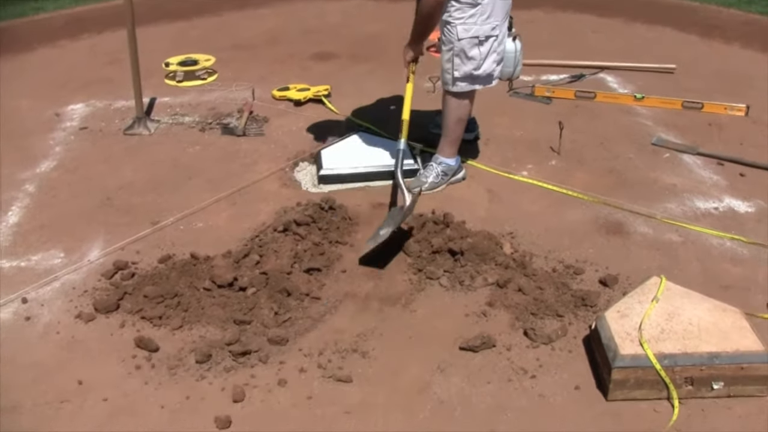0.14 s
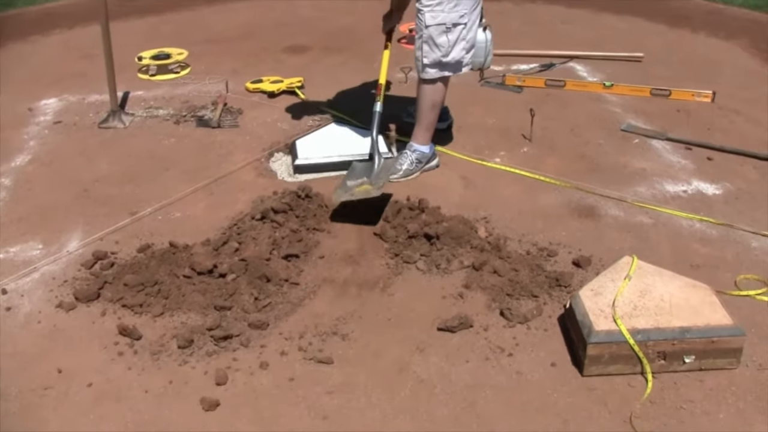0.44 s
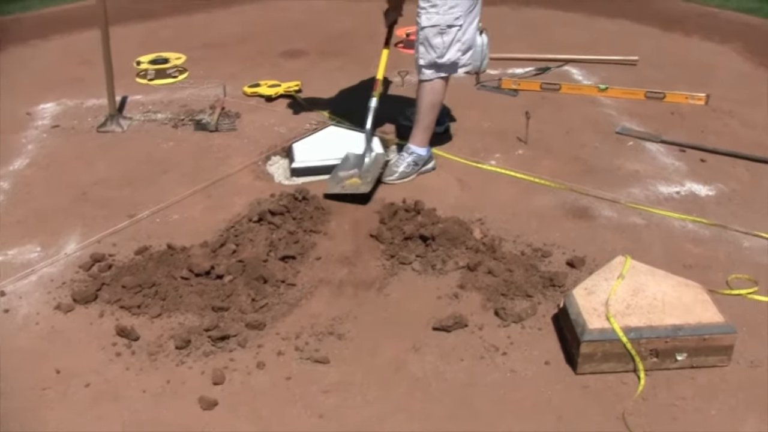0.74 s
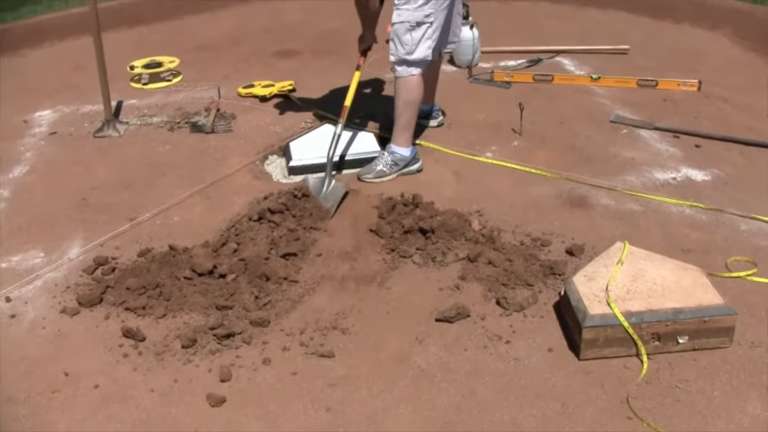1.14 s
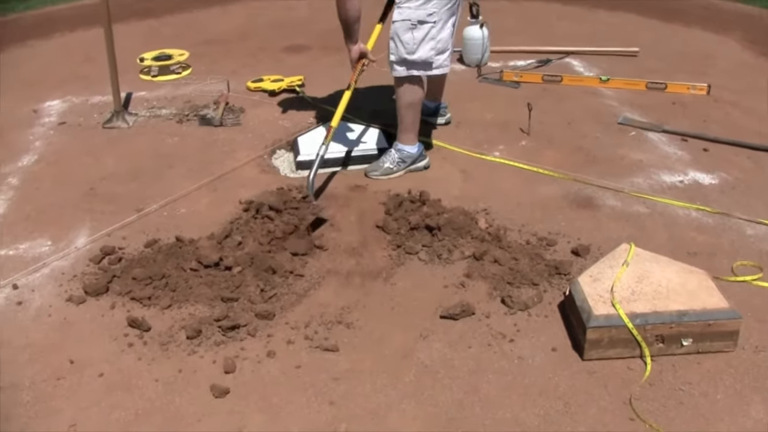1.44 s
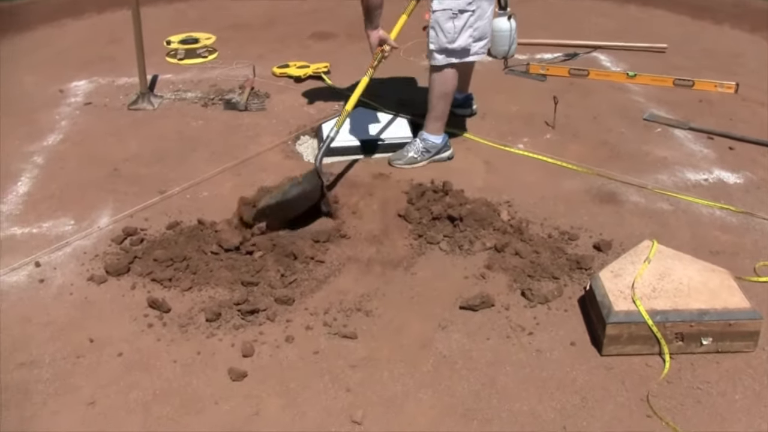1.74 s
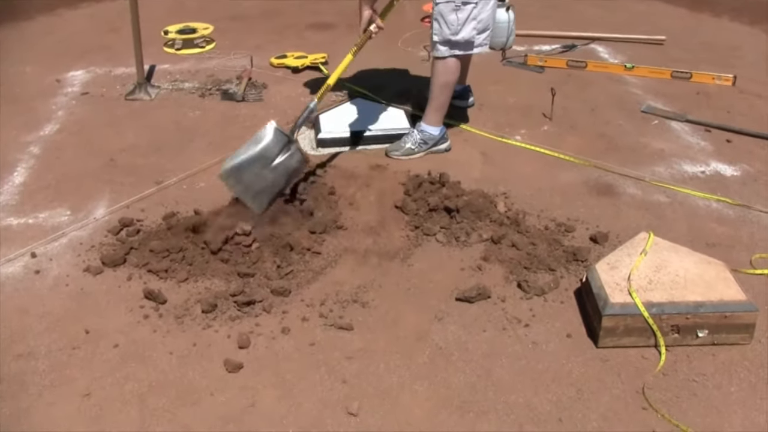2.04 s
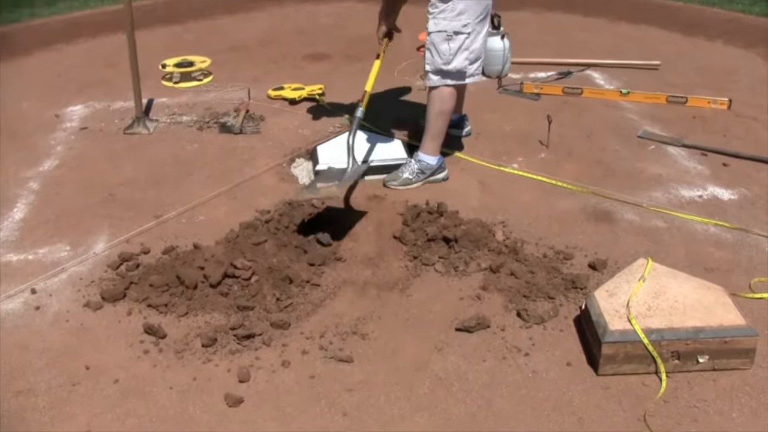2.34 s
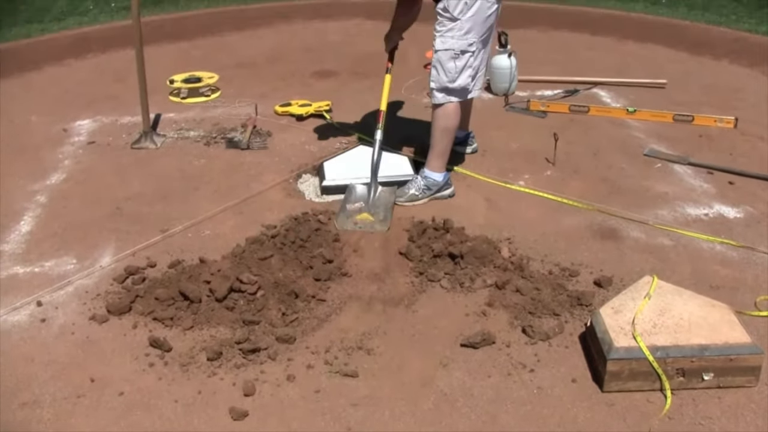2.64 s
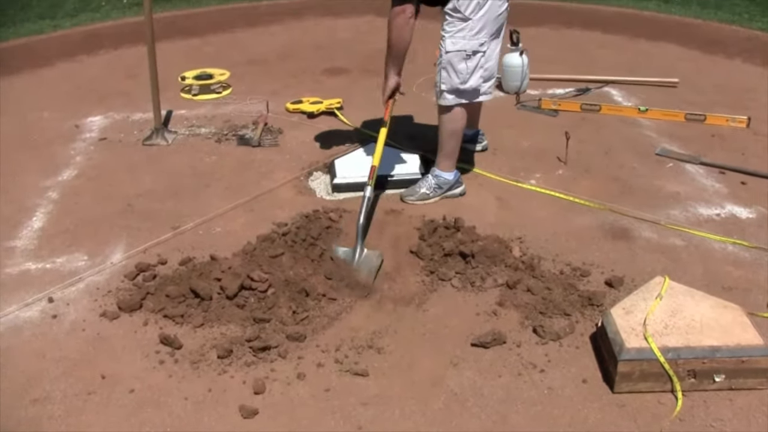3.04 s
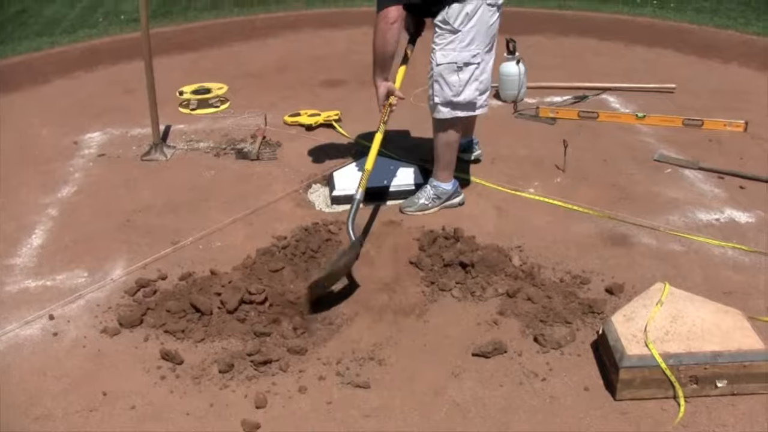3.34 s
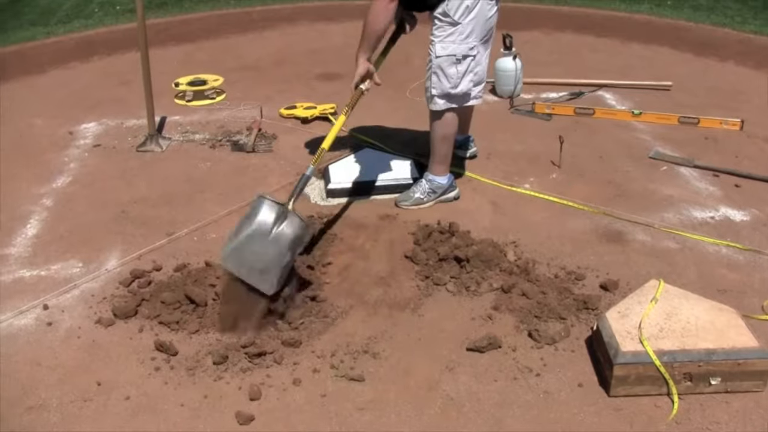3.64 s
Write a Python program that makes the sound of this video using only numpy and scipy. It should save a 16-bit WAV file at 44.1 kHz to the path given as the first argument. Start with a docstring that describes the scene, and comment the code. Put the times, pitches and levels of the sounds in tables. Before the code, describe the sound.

A metal shovel scrapes loose dry soil twice, gritty and ringing, with faint crumbs trickling after each stroke; a soft thud starts the second. Open field, low distant traffic, close-sounding stereo camera microphone.

```python
"""A distant traffic drone with faint warbles and a tinkling metal fitting; then a steel shovel scrapes twice
through loose dry soil on an open field, with soil trickling off after each stroke.
Grit ticks and stones ring the blade's damped modes over a patchy soil hiss; a decaying sine thuds as the
blade is set down. The fitting is struck sines and the warbles are resonant noise.
The drone is coloured noise in four parts: one holds its level, three sink unevenly."""
import sys
import numpy as np
from scipy import signal
from scipy.fft import rfft, irfft
from scipy.io import wavfile
from scipy.ndimage import uniform_filter1d

SR = 44100
rng = np.random.default_rng(int(sys.argv[2]) if len(sys.argv) > 2 else 0)


def bounce(signal):
    """Save signal as a 16-bit WAV file at the path given by the first command-line argument."""
    frames = np.transpose(np.atleast_2d(signal))
    limited = np.clip(frames, -1, 1)
    pcm = np.round(limited * 32767).astype(np.int16)
    wavfile.write(sys.argv[1], SR, pcm)


N = 167580
T, HZ = np.arange(N) / SR, np.arange(N // 2 + 1) * SR / N

# first stroke, touch-down, second stroke: t/s, low ring level/dB, low ring centre f/Hz,
# middle ring level/dB, high ring level/dB, treble grit level/dB
STROKES = [
    [(0.92, -68, 892, -75, -78, -94), (0.938, -68, 887, -49, -62, -56.5), (0.962, -57, 850, -69, -59, -54),
     (0.992, -51, 815, -49, -52.5, -48.5), (1.018, -68, 860, -64, -40.5, -37.5),
     (1.05, -49, 825, -57, -56, -52), (1.092, -39, 930, -25.5, -31, -34.5),
     (1.144, -15, 940, -25.5, -29.5, -30.5), (1.17, -29, 950, -34, -33.5, -36),
     (1.19, -23, 1150, -24, -28.5, -32), (1.202, -22, 1030, -31.5, -30, -33),
     (1.232, -21.5, 1100, -24, -30.5, -32), (1.25, -31, 1030, -34.5, -36.5, -37.5),
     (1.27, -26, 1130, -29, -33, -34.5), (1.304, -38, 1090, -38, -43, -48),
     (1.328, -30.5, 1190, -31.5, -39, -42), (1.37, -63, 1100, -55, -65, -64),
     (1.42, -70, 1080, -62, -68, -83)],
    [(2.672, -63, 780, -74, -78, -86), (2.68, -38, 772, -50, -54, -50.5), (2.686, -38, 750, -54, -49, -44),
     (2.7, -34.5, 724, -53, -55.5, -58), (2.744, -56.5, 770, -68, -79, -85)],
    [(2.77, -40.5, 1040, -79, -89, -67), (2.78, -68.5, 1130, -69, -54.5, -51),
     (2.806, -46.5, 1210, -64, -49, -45), (2.818, -24, 1140, -25, -27.5, -31.5),
     (2.828, -19, 1060, -20, -27, -24), (2.842, -30.5, 1190, -29.5, -34.5, -33.5),
     (2.868, -20.5, 980, -23, -26.5, -23), (2.896, -14.5, 950, -21.5, -30.5, -35),
     (2.906, -16.5, 944, -20.5, -22, -22), (2.964, -14, 980, -19, -25, -26.5),
     (3.018, -22, 1075, -27, -36, -36), (3.028, -24.5, 1070, -27, -35.5, -33.5),
     (3.07, -23, 1110, -31, -34, -36.5), (3.106, -38.5, 1000, -39, -39, -36),
     (3.126, -54, 1006, -48.5, -51.5, -52), (3.166, -45.5, 880, -82, -50, -47),
     (3.2, -55, 903, -73, -79, -76)],
]
# soil sliding off the lifted blade after each stroke: t/s, level/dB, treble level/dB
TRICKLES = [
    [(1.706, -88, -86), (1.728, -70, -60), (1.76, -96.5, -78), (1.794, -94, -83), (1.886, -66.5, -62),
     (1.944, -71, -72), (1.976, -64.5, -60), (2.004, -44.5, -49), (2.038, -47.5, -57.5), (2.066, -59, -76),
     (2.13, -76, -91), (2.196, -91.5, -94)],
    [(3.43, -90, -91.5), (3.456, -80, -76), (3.496, -89, -89), (3.518, -78, -60), (3.53, -69, -54),
     (3.542, -65, -63), (3.582, -69, -78), (3.65, -92, -83), (3.736, -77.5, -71), (3.77, -86, -83),
     (3.79, -90, -84)],
]
# tick density (ticks per s) and unevenness (dB) of scraped grit and of trickling sand
GRIT_PER_S, GRIT_SPREAD_DB, SAND_PER_S, SAND_SPREAD_DB = 6000, 2.6, 2500, 2.5


def undb(db):
    """Decibels to gain."""
    return 10 ** (np.asarray(db) / 20)


def unit(x):
    """Scale to rms 1."""
    return x / np.sqrt(np.mean(x ** 2))


def on_hz(table):
    """A (f/Hz, value) table at every frequency, straight on a log axis."""
    f, v = np.array(table, float).T
    return np.interp(np.log(HZ + 1), np.log(f + 1), v)


def shape(x, gain):
    """Filter by a gain per frequency."""
    return irfft(rfft(x) * gain, N)


def resonance(hz, width_hz, db=0):
    """Response of one damped mode with its peak gain; it is never narrower than 5 Hz."""
    detune = (HZ ** 2 - hz ** 2) / (np.maximum(HZ, 1) * max(width_hz, 5))
    return undb(db) / (1 + 1j * detune)


def curve(tables, column):
    """Gain over time from level tables; practically silent between them."""
    total = 0
    for table in tables:
        rows = np.array(table)
        total = total + undb(np.interp(T, rows[:, 0], rows[:, column], left=-150, right=-150))
    return total


def ticks(per_s, spread_db):
    """Dense random ticks of uneven size and either sign."""
    chance, sign, size = rng.random((3, N))
    loudness = undb(-spread_db * np.log(1 - size))
    return unit((chance < per_s / SR) * np.sign(sign - .5) * loudness)


def walk(rate):
    """Random levels held 1 / rate s and slewed twice."""
    steps = 8  # per held level
    coarse = np.repeat(rng.standard_normal(int(N * rate / SR) + 2), steps)
    coarse = 1.3 * uniform_filter1d(uniform_filter1d(coarse, steps), steps)
    return np.interp(T * rate * steps, np.arange(len(coarse)), coarse)


def patchy(table, tables, columns, per_s, spread_db, patch_db, split_hz):
    """Grains in narrow bands, each band swelling on its own; two level curves meet at the split."""
    crunch_db, crunch_per_s, patch_per_s = 2.5, 250, 45
    colour = undb(on_hz(table))
    low, high = curve(tables, columns[0]), curve(tables, columns[1])
    low_norm, high_norm = [np.sqrt(np.sum(colour[m] ** 2) / len(HZ))
                           for m in (HZ < split_hz, HZ >= split_hz)]
    shared = ticks(per_s, spread_db)
    crunch = crunch_db * walk(crunch_per_s)  # moves all bands together
    spectrum = 0
    for k, hz in enumerate(1400 * 2 ** np.arange(0, 3.6, 1 / 8)):  # eight bands per octave
        band = colour * np.exp(-(np.log2(HZ / hz + 1e-9) * 10) ** 2)
        swell = undb(crunch + patch_db * walk(patch_per_s))
        # shifted copies give each band partly its own grains
        grains = (shared + np.roll(shared, 7919 * (k + 1))) * swell
        level = low / low_norm if hz < split_hz else high / high_norm
        spectrum = spectrum + rfft(grains * level) * band
    return irfft(spectrum, N)


def drone():
    """Far traffic as noise with broad tones: a rumble and three parts above it, each fading its own way."""
    # noise colour: f/Hz, level/dB
    noise_colour = [(30, -39.5), (90, -21.5), (118, -16.5), (153, -13.5), (227, -0.5), (303, 4), (345, 5),
                    (616, -8.5), (666, -8), (4080, -42.5), (6550, -53.5), (8520, -61.5), (16000, -65)]
    # broad tones: f/Hz, width/Hz, level/dB before the response is squared
    hums = [(120, 3.3, 7), (153.8, 16, 3.5), (183, 11, 2.5), (236.6, 20, 6), (302.2, 15.2, 4),
            (439.5, 5.8, 1.5), (495.4, 5.3, 2.5), (605, 2.4, 4), (860, 120, -5)]
    # t/s, low part level/dB, middle part level/dB, upper part level/dB
    part_levels = [
        [(0.0, -42, -41, -43.5), (0.78, -50, -46, -44), (1.23, -44.5, -46, -41.5), (1.38, -48, -53, -44),
         (2.75, -55.5, -56.5, -49), (2.93, -47, -38.5, -45), (3.19, -53.5, -61, -46), (3.8, -58, -77, -47.5)],
    ]
    # stereo balance: f/Hz, left minus right level/dB
    balance = [(60, -6.5), (110, -1), (200, -5.0), (380, -4.5), (700, 0.5), (1290, 0.5), (2380, 0),
               (4400, 1), (8120, 8), (15000, -0.5)]
    # stereo width: f/Hz, side minus mid level/dB
    side_levels = [(60, -16), (250, -16), (640, -10.5), (3000, -10), (7000, 1.5), (15000, -8)]
    rumble_db, rumble_top_hz, low_top_hz, middle_top_hz = -51.5, 199, 405, 680
    flicker_db, flicker_per_s = 1.5, 70

    def power_below(hz):
        """Power share of a soft low-pass."""
        return 1 / (1 + (HZ / hz) ** 8)

    tones = sum(np.abs(resonance(*hum)) ** 2 for hum in hums)
    colour = undb(on_hz(noise_colour)) * (1 + tones)
    width, lr = undb(on_hz(side_levels)), on_hz(balance)
    a, b, c = power_below(rumble_top_hz), power_below(low_top_hz), power_below(middle_top_hz)
    parts = np.sqrt([a, b - a + 1e-12, c - b + 1e-12, 1 - c])
    levels = [undb(rumble_db)] + [curve(part_levels, column) for column in (1, 2, 3)]
    out = 0
    for part, level in zip(parts, levels):
        mid, side = rng.standard_normal((2, N))
        pair = [shape(mid, colour * part * undb(s * lr / 2)) + s * shape(side, colour * part * width)
                for s in (1, -1)]  # left, right
        out = out + unit(np.array(pair)) * level * undb(flicker_db * walk(flicker_per_s))
    return out


def warbles():
    """Faint unsteady tones: noise through two equal resonances in series, swelling and fading."""
    # start t/s, length/s, f/Hz, width of each resonance/Hz, level/dB
    swells = [(0.216, 0.22, 4660, 120, -71), (.55, 0.39, 3200, 200, -68.5)]
    out = 0
    for start_s, length_s, hz, width_hz, db in swells:
        tone = unit(shape(rng.standard_normal(N), resonance(hz, width_hz) ** 2))
        arch = np.sin(np.pi * np.clip((T - start_s) / length_s, 0, 1))
        out = out + undb(db) * tone * arch
    return out


def tinkles():
    """A small metal fitting: a noise tick and a short bright ring of sines that rattles."""
    # hits: t/s, level/dB, f/Hz
    hits = [(0.3485, -47.5, 7810), (0.4419, -54, 7900), (0.4589, -55, 7870), (0.475, -55.5, 7670),
            (0.5086, -53.5, 7800), (0.617, -56.5, 7840), (0.824, -57.5, 9000), (3.457, -64.5, 9460),
            (3.5285, -52, 5500)]
    # modes of the fitting: share of the pitch, level/dB
    partials = [(1, 0), (.89, -13), (.59, -14), (1.6, -17)]
    t60_s, tick_db, tick_s = .06, -19, .001
    rattle_db, rattle_per_s = 3.0, 300
    length = 6000  # samples per hit
    t, out = T[:length], np.zeros(N + length)
    rattle = rattle_db * walk(rattle_per_s)
    for s, db, hz in hits:
        start = int(s * SR)
        tone = sum(undb(d) * np.sin(2 * np.pi * hz * share * t) for share, d in partials)
        tone = tone * undb(-60 * t / t60_s + rattle[start:][:length])
        tick = np.diff(rng.standard_normal(length), prepend=0) * np.exp(-t / tick_s)
        out[start:start + length] += undb(db) * (tone + undb(tick_db) * tick)
    return out[:N]


def blade():
    """Grit, stones and crumbs ring each mode through its own shifting contact; the lifted blade rings longer.

    The load of soil moves the centre of the low ring."""
    # blade modes damped by soil: f/Hz, width/Hz, level/dB at the first angle, level/dB at the second angle
    modes = [(467, 30, -20.5, -4), (744, 30, 1, -1.5), (836, 100, -2, 4), (940, 36, -1, 2.5),
             (1030, 130, -3.5, -6), (1110, 190, -3, 1.5), (1190, 26, 1, -0.5), (1320, 140, 0.5, 1.5),
             (1381, 110, 0.5, 3.5), (1597, 140, -2, -10.5), (1824, 120, 2.5, -4.5), (1900, 23, -7.5, -6),
             (2016, 72, -0.5, -4), (2230, 70, -9, -5), (2475, 160, -6, -2), (2570, 80, -9, -3),
             (2680, 180, -12, -8), (2980, 410, 1, 2.5), (3480, 45, -3.5, -8.5), (3690, 150, -12.5, 2.5),
             (3980, 230, -2, -1.5), (4290, 120, -4.5, -8), (4506, 95, -0.5, 1), (4950, 130, -3.5, -0.5),
             (5500, 120, -16, -16.5), (5900, 80, -21.5, -6.5), (6250, 200, -5.5, -4.5),
             (6720, 160, -3.5, -2)]
    bowl_top_hz, edge_top_hz = 1600, 2700  # split the modes into low, middle and high rings
    regrip_s = 2.4  # the blade angle changes here
    centre_oct, skirt_share, radiates_above_hz = .35, .2, 340
    contact_db, contact_per_s, catch_db, catch_per_s = 2.0, 40, 2.0, 160
    sand_ring_db, sand_patch_db, crumb_per_s = -7, 6.0, 30
    crumb_low_hz, free_width_hz = 2500, 45  # lowest mode crumbs ring; widest mode of the lifted blade

    rows = np.vstack(STROKES)
    centre = np.interp(T, rows[:, 0], rows[:, 2])
    levels = [curve(STROKES, column) for column in (1, 3, 4)]
    lifted = curve(TRICKLES, 1)
    free = lifted > undb(-120)
    grit, sand = ticks(GRIT_PER_S, GRIT_SPREAD_DB), ticks(SAND_PER_S, SAND_SPREAD_DB)
    catch = undb(catch_db * walk(catch_per_s))  # flickers all modes together
    spectrum = 0
    for k, (hz, width_hz, first_db, second_db) in enumerate(modes):
        group = int(hz > bowl_top_hz) + int(hz > edge_top_hz)
        angle = undb(np.where(T < regrip_s, first_db, second_db))
        grains = .8 * grit + np.roll(grit, 6007 * (k + 1))  # partly its own grains
        contact = undb(contact_db * walk(contact_per_s))
        scrape = grains * catch * contact * levels[group] * angle
        if group == 0:
            scrape = scrape * np.exp(-(np.log2(centre / hz) / centre_oct) ** 2 / 2)
        patches = undb(sand_ring_db + sand_patch_db * walk(crumb_per_s))
        crumbs = np.roll(sand, 6007 * k) * patches * lifted * (hz > crumb_low_hz)
        taps = stones(hz)
        in_soil = (scrape + taps * ~free, width_hz)
        in_air = (crumbs + taps * free, min(width_hz, free_width_hz))
        for push, w in (in_soil, in_air):
            response = resonance(hz, w) * resonance(hz, skirt_share * hz)  # the second trims the far skirts
            # neighbouring modes have opposite sign; narrow modes get more gain
            spectrum = spectrum + (-1) ** k * rfft(push) * response * np.sqrt(SR / 20 / max(w, 5))
    return irfft(spectrum / (1 + (radiates_above_hz / (HZ + 1)) ** 4), N)


def soil_hiss():
    """Scraped grit hisses in patches that follow the strokes."""
    # hiss colour: f/Hz, level/dB
    grit_colour = [(880, -29), (1500, -7.5), (1840, 2), (3360, -16.5), (3810, -18.5), (5540, 1.5),
                   (6550, -20.5), (7220, -19.5), (10700, -22), (15700, -29.5)]
    return undb(-9) * patchy(grit_colour, STROKES, (4, 5), GRIT_PER_S, GRIT_SPREAD_DB,
                             patch_db=2.5, split_hz=7000)


def stones(hz):
    """Impulses of stones knocking the blade, as the mode at hz gets them; low knocks reach more neighbours."""
    # t/s, relative push/dB, f of the modes they wake/Hz
    knocks = [(.988, -40.5, 1900), (1.013, -51, 1900), (.992, -62, 2940), (1.015, -50, 2980),
              (1.022, -57, 3690), (1.029, -56, 1900), (1.03, -61, 2980), (1.06, -57, 4420),
              (1.075, -45.5, 2480), (1.1, -34, 1930), (1.1, -39.5, 4290), (1.135, -27.5, 870),
              (1.145, -27.5, 1790), (1.188, -24.5, 1750), (1.194, -25.5, 1030), (1.229, -30, 1110),
              (1.267, -24, 1030), (1.325, -44, 4950), (1.726, -73, 5900), (1.877, -75, 5500),
              (1.982, -62, 5400), (2.001, -60, 4370), (2.003, -52, 5500), (2.006, -54.5, 2590),
              (2.027, -52.5, 4550), (2.033, -60, 3480), (2.047, -61, 3480), (2.065, -84, 6720),
              (2.09, -70, 5900), (2.683, -55.5, 4290), (2.691, -35.5, 733), (2.717, -46.5, 800),
              (2.826, -25.5, 1313), (2.828, -35.5, 4950), (2.909, -38, 943), (2.954, -31, 1030),
              (2.957, -31, 3980), (3.16, -48.5, 3750), (3.608, -74, 5900)]
    reach_oct = .06  # at 4000 Hz
    out = np.zeros(N)
    for s, db, pitch in knocks:
        distance = np.log2(pitch / hz) / reach_oct / np.sqrt(4000 / pitch)
        out[int(s * SR)] += 100 * undb(db) * np.exp(-distance ** 2 / 2)
    return out


def trickles():
    """Crumbs patter down the blade: a grainy hiss in scattered patches."""
    # trickle colour: f/Hz, level/dB
    sand_colour = [(1400, -30), (2700, -12), (3200, -14), (4500, -2), (5500, 0), (6700, -2), (8500, -7),
                   (11000, -9), (15700, -10)]
    return undb(-9) * patchy(sand_colour, TRICKLES, (1, 2), SAND_PER_S, SAND_SPREAD_DB,
                             patch_db=6.0, split_hz=8000)


def thud():
    """The ground thuds as the blade is set down: a decaying sine with a soft attack."""
    start_s, start_db, hz, t60_s, attack_s = 2.687, -25, 350, 0.055, 0.0035
    t = np.maximum(T - start_s, 0)
    decay = undb(start_db - 60 * t / t60_s)
    return decay * (1 - np.exp(-t / attack_s)) * np.sin(2 * np.pi * hz * t)


def ports(x):
    """Two microphone ports hear the near sounds at their own levels, plus a frequency-shaped scattered side."""
    # stereo balance: f/Hz, left minus right level/dB
    port_balance = [(500, 2.5), (1000, 1), (3000, 1), (7000, 0), (10000, -1.5), (13000, 7)]
    # scattered part: f/Hz, side minus mid level/dB
    scatter = [(500, -18), (1500, -25), (4000, -30), (6500, -24), (9000, -8), (12000, -5), (15000, -3)]
    scatter_per_s = 400
    side = shape(x, undb(on_hz(scatter))) * walk(scatter_per_s)
    lr = on_hz(port_balance)
    return np.array([shape(x, undb(s * lr / 2)) + s * side for s in (1, -1)])


def scene():
    """Far drone, with warbles, fitting and shovel through the two ports."""
    shovel = blade() + soil_hiss() + trickles() + thud()
    return drone() + ports(warbles() + tinkles() + shovel)


def record(dry):
    """The camera rounds the loudest peaks by tanh and cuts the top with a steep low-pass."""
    soft_top, top_hz = 1.6, 15780
    soft = soft_top * np.tanh(dry / soft_top)
    low_pass = signal.ellip(10, .2, 80, top_hz, fs=SR, output="sos")
    return signal.sosfilt(low_pass, soft)


dry = scene()
out = record(dry)
bounce(out)
```